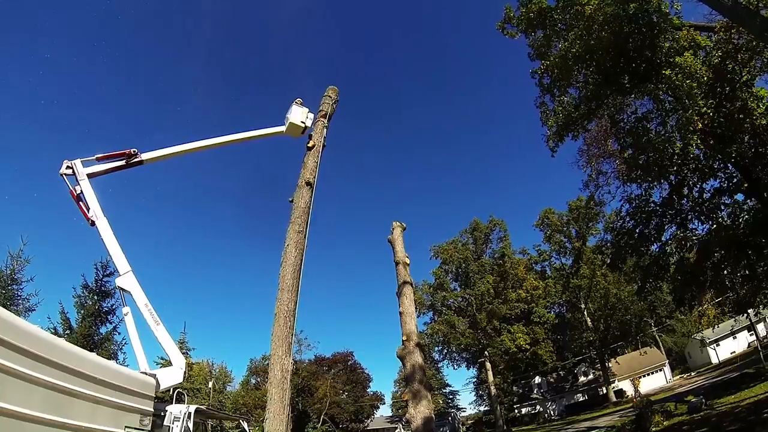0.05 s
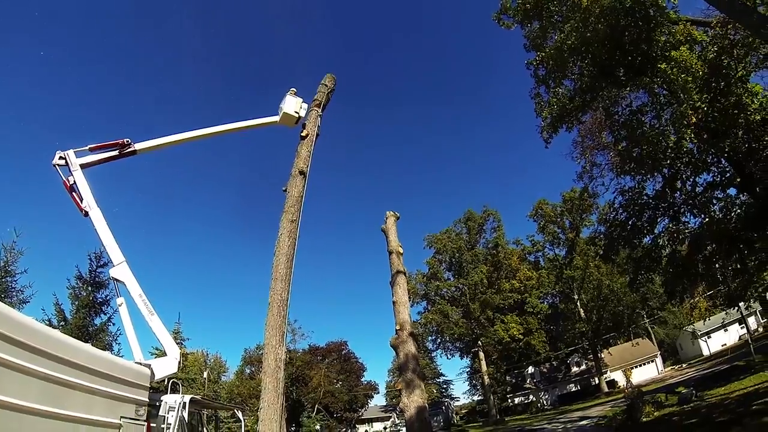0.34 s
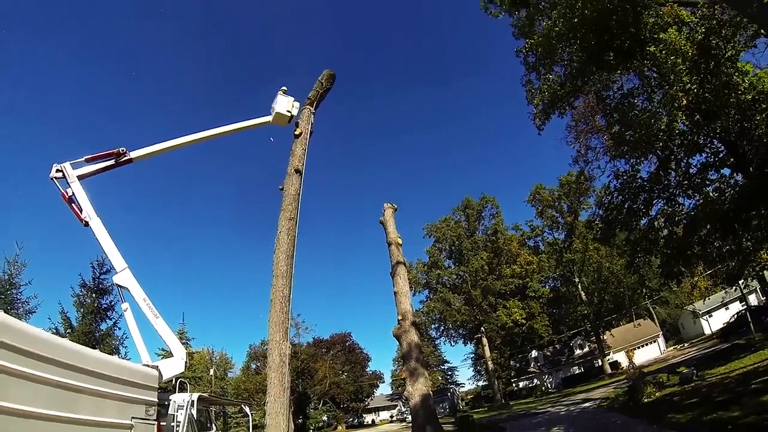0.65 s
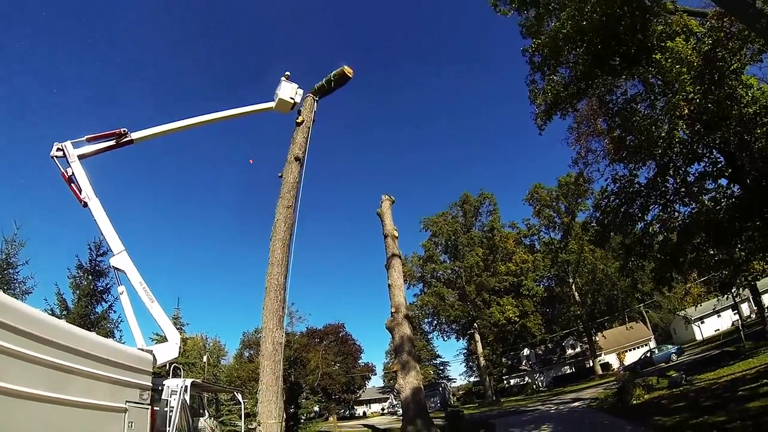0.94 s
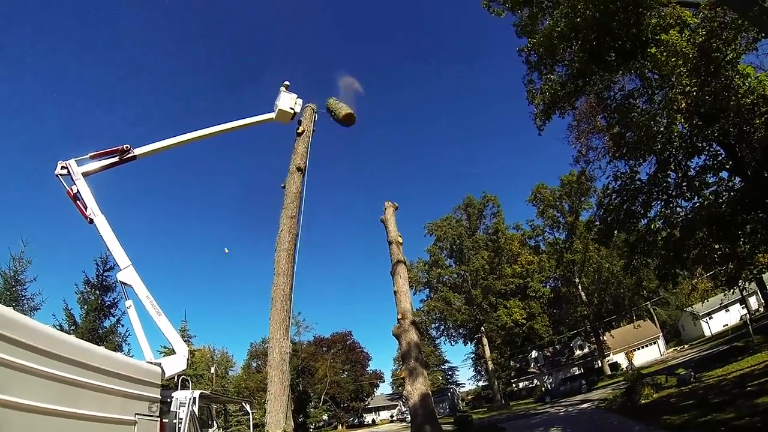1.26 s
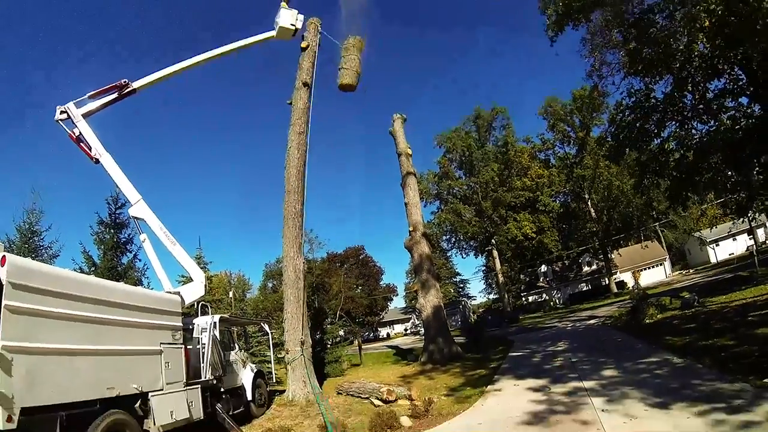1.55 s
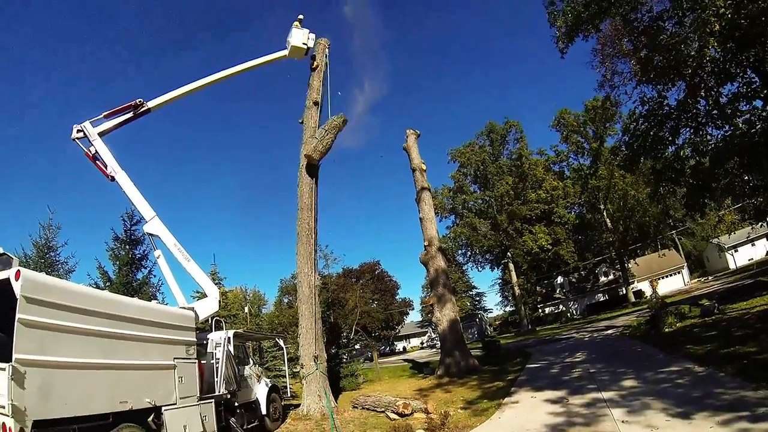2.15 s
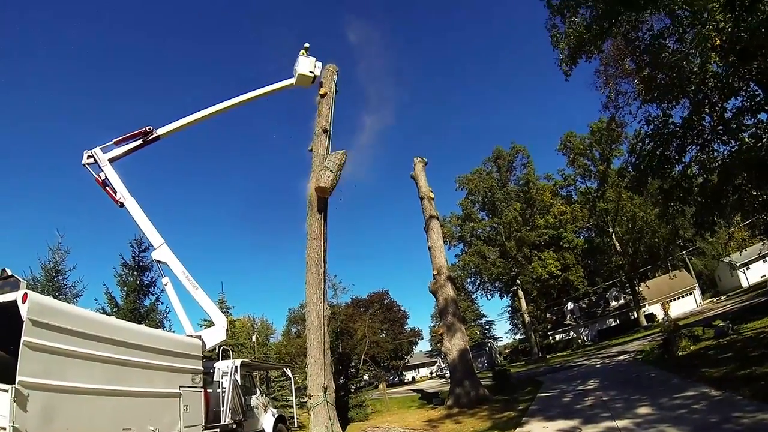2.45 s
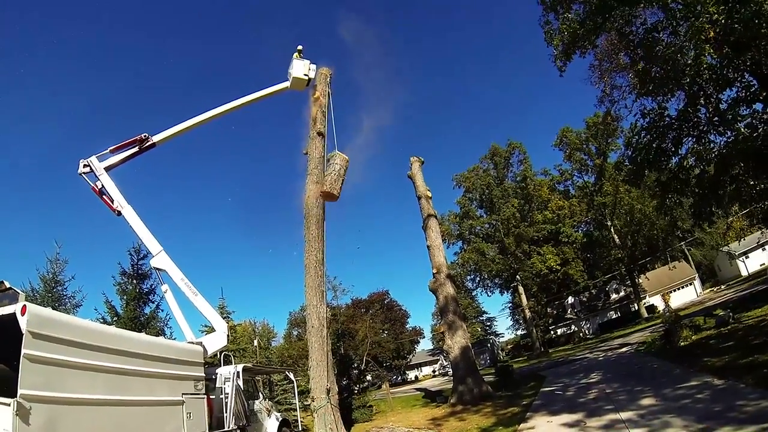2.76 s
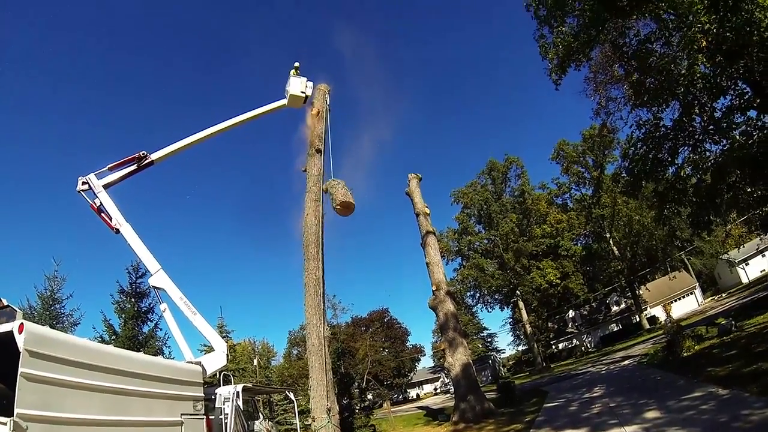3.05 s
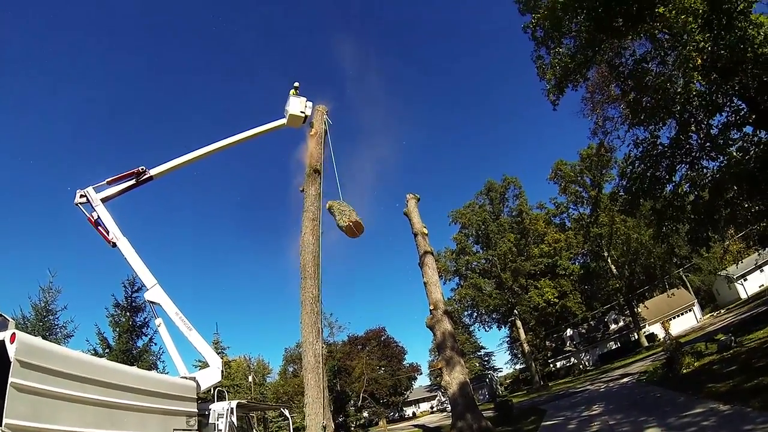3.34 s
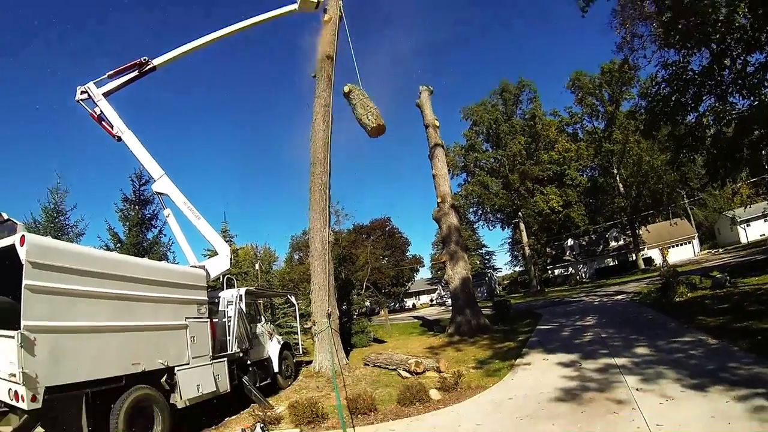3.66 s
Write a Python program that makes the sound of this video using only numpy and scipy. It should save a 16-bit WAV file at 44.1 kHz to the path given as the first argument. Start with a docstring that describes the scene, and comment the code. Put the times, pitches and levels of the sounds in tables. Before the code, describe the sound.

A falling log snaps its rope tight, then knocks against a trunk, over engine drone.

```python
"""A log caught on a rope

A sawn log tips off a standing trunk, runs out on its rope, is caught with a crack and swings into
the trunk. A lift truck's engine drones nearby. We hear it from a body-worn camera in a plastic case
that rings near 1.5 kHz. The camera clicks in its mount, rumbles with movement and air, and whines faintly.
"""
import sys
import numpy as np
from scipy import signal
from scipy.fft import rfft, irfft, next_fast_len
from scipy.io import wavfile
from scipy.ndimage import uniform_filter1d, map_coordinates

SR = 44100
rng = np.random.default_rng(int(sys.argv[2]) if len(sys.argv) > 2 else 0)


def pcm_store(signal):
    """Save signal as 16-bit PCM."""
    levels = np.round(np.clip(np.atleast_2d(signal), -1, 1) * 32767)
    wavfile.write(sys.argv[1], SR, levels.astype(np.int16).T)


N = 167580  # 3.8 seconds


def amp(db):
    """Turn decibels into a number to multiply by."""
    return 10 ** (np.asarray(db) / 20)


def unit(x):
    """Scale a signal to an average power of 1."""
    return x / np.sqrt(np.mean(x ** 2) + 1e-20)


def clock():
    """The time of each sample, in seconds."""
    return np.arange(N) / SR


def curve(rows):
    """Join (time [s], value) points with straight lines."""
    return np.interp(clock(), *np.transpose(rows))


def wobble(rate):
    """A smooth curve through `rate` random values a second."""
    return map_coordinates(rng.standard_normal(int(N * rate / SR) + 4), [clock() * rate])


def coloured(x, points):
    """Give a sound its tone colour from (frequency [Hz], level [dB]) points; only their shape counts."""
    size = 2 * next_fast_len(N)
    hz, db = np.transpose(points)
    shape_db = np.interp(np.log(np.fft.rfftfreq(size, 1 / SR) + 1), np.log(hz + 1), db)
    cepstrum = irfft(np.log(amp(shape_db)), size)
    # Folding this in half makes the filter ring after a hit, never before it.
    cepstrum[1:size // 2] *= 2
    cepstrum[size // 2 + 1:] = 0
    response = np.exp(rfft(cepstrum))
    response /= np.sqrt(np.mean(abs(response) ** 2))
    return irfft(rfft(x, size) * response, size)[:N]


def lowpass(x, hz):
    """Dull the treble above hz, as a soft contact does."""
    return signal.sosfilt(signal.butter(2, min(hz, SR / 2 - 1), fs=SR, output="sos"), x)


def grit(rate, spread_db):
    """Tiny random breaks of uneven size, about `rate` a second."""
    breaks = (rng.random(N) < rate / SR) * rng.choice([-1, 1], N)
    sizes = amp(spread_db * np.clip(rng.standard_normal(N), -2, 2))
    return unit(breaks * sizes)


def fade(start, fade_s, attack_s):
    """Rise quickly at `start`, then die away by 60 dB in fade_s seconds."""
    t = np.maximum(clock() - start, 0)
    return np.exp(-np.log(1000) * t / fade_s) * (1 - np.exp(-t / attack_s))


def struck(hits, notes):
    """Each hit rings an object's own notes, a little differently every time."""
    out = np.zeros(N + SR)
    t = np.arange(SR // 4) / SR
    for start, hit_db in hits:
        for hz, note_db, fade_s in notes:
            gain = amp(hit_db + note_db + rng.uniform(-1, 1))
            ring = np.exp(-np.log(1000) * t / fade_s) * np.sin(2 * np.pi * hz * t)
            out[int(start * SR):][:len(t)] += gain * ring
    return out[:N]


# The engine's tone colour through the case (frequency [Hz], level [dB])
ENGINE_COLOUR = [(110, -29), (220, -18.5), (310, -20), (380, -20), (540, -23.5), (660, -22.5), (740, -25),
                 (900, -19.5), (970, -27), (1030, -14.5), (1220, -14.5), (1320, -2.5), (1420, -4.5),
                 (1520, 2), (1620, 1), (1720, -13.5), (1930, -12.5), (2030, -20.5), (2220, -17),
                 (2400, -23), (2900, -25), (3170, -19), (3380, -27), (3600, -25), (3780, -27), (4050, -17),
                 (4400, -37.5), (5050, -31), (5800, -38.5), (6800, -40), (7700, -38), (9200, -44),
                 (10300, -43), (10800, -44), (11400, -47), (13000, -46), (15200, -47)]
# How the engine swells and sinks (time [s], relative level [dB])
ENGINE_LEVEL = [(0.0, -42.5), (0.34, -43), (1.54, -41.5), (1.81, -44), (2.32, -43), (2.54, -45), (3.8, -45)]
# The notes it hums (pitch [Hz], typical level [dB])
ENGINE_NOTES = [(456, -76), (672, -73.5), (915.5, -68.5), (1357, -68.5), (1486, -54.5), (1814, -65),
                (4005, -69.5), (4070, -87)]


def engine():
    """The engine clatters in pulses, one for each firing, and hums slightly unsteady notes."""
    firing_hz = 41.73
    phase = 2 * np.pi * np.cumsum(firing_hz + 0.2 * wobble(2)) / SR
    pulse = 1 + 0.12 * (np.cos(phase) + 0.42 * np.cos(2 * phase)) + 0.037 * np.cos(phase / 2)
    clatter = unit(coloured(pulse * rng.standard_normal(N), ENGINE_COLOUR))
    hum = np.zeros(N)
    for hz, db in ENGINE_NOTES:
        gain = np.sqrt(2) * amp(db + 2.5 * wobble(14))
        pitch = hz + 4.04 * wobble(14)
        hum += gain * np.sin(2 * np.pi * np.cumsum(pitch) / SR)
    level = curve(ENGINE_LEVEL)
    return amp(level - 1) * clatter + amp(level - level.mean()) * hum


# The camera's thin, high notes (pitch [Hz], level [dB])
WHINE_NOTES = [(10644, -75.5), (10692, -85), (10740, -92), (13188, -89)]


def whine():
    """The camera whines faintly and steadily."""
    return sum(np.sqrt(2) * amp(db) * np.sin(2 * np.pi * (hz * clock() + rng.random()))
               for hz, db in WHINE_NOTES)


# How strongly movement and air shake the camera (time [s], relative level [dB])
MOVEMENT_LEVEL = [(0.0, -47), (0.04, -39), (0.57, -21.5), (0.9, -25), (0.95, -16.5), (1.22, -30.5),
                  (1.39, -23), (1.63, -25), (1.84, -22), (1.95, -28.5), (2.7, -33.5), (2.96, -29.5),
                  (3.26, -34), (3.37, -30), (3.77, -35.5), (3.8, -48)]
MOVEMENT_DB = -1.75
# The rumble's deep tone colour (frequency [Hz], level [dB])
RUMBLE_COLOUR = [(3, -23), (10, 0), (22, 1.5), (32, 1.5), (42, -4), (59, -2), (72, -12), (87, -22.5),
                 (130, -26), (190, -44), (380, -48.5), (800, -65), (3000, -110)]


def rumble():
    """Movement and passing air make a low rumble."""
    air = coloured(rng.standard_normal(N), RUMBLE_COLOUR)
    local_power = abs(uniform_filter1d(air ** 2, size=SR // 8))
    even_air = air / np.sqrt(local_power + 1e-12)
    return amp(curve(MOVEMENT_LEVEL) + MOVEMENT_DB) * even_air


# Soft bumps on the camera (time [s], relative level [dB])
BUMP_HITS = [(0.233, -38.5), (0.295, -38.5), (0.556, -29), (0.69, -35.5), (0.735, -30.5), (0.769, -48),
             (0.918, -50), (1.012, -31.5), (1.32, -42), (1.374, -32), (1.518, -39), (1.574, -37),
             (1.785, -40), (2.321, -53), (2.609, -42), (2.692, -40.5), (3.121, -42), (3.349, -44),
             (3.489, -45), (3.65, -41)]
# Their dull tone colour (frequency [Hz], level [dB])
BUMP_COLOUR = [(30, -12), (65, 3.5), (130, -2.5), (220, -11), (390, -17), (550, -28), (1500, -25),
               (3000, -49), (8000, -100)]


def bumps():
    """The camera takes soft bumps, and small uneven jolts that grow with the movement."""
    movement = amp(curve(MOVEMENT_LEVEL) + MOVEMENT_DB)
    unevenness = unit(amp(6.5 * np.clip(wobble(40), -1.5, 1.5)))
    jolts = amp(-23.5) * movement * unevenness
    hits = sum(amp(db + 3.5) * fade(start, 0.063, attack_s=0.0028) for start, db in BUMP_HITS)
    return coloured(rng.standard_normal(N) * (hits + jolts), BUMP_COLOUR)


# Faint low groans (time [s], length [s], first pitch [Hz], last pitch [Hz], level [dB])
GROAN_SLIDES = [(0.501, 0.061, 410, 352, -46.5), (1.892, 0.069, 235, 273, -54.5),
                (1.977, 0.12, 285, 223, -48)]


def groans():
    """Soft notes swell, slide and fade: likely the uncut strip of wood bending, then the loaded rope."""
    settle_s = 0.022
    out = np.zeros(N)
    for start, length, first_hz, last_hz, db in GROAN_SLIDES:
        t = np.clip(clock() - start, 0, length)
        pitch = last_hz + (first_hz - last_hz) * np.exp(-t / settle_s)
        swell = np.sin(np.pi * t / length)
        out += amp(db) * swell * np.sin(2 * np.pi * np.cumsum(pitch) / SR)
    return out


def yard_echo(x):
    """Trees and houses send back a short, dull echo."""
    tail = lowpass(rng.standard_normal(N), hz=4300) * fade(0.022, fade_s=0.63, attack_s=0.012)
    return signal.fftconvolve(x, tail / np.linalg.norm(tail))[:N]


# Slips of the camera's mount (time [s], relative level [dB], treble limit [Hz])
MOUNT_SLIPS = [(.59, -23, 8800), (0.61, -33, 8000), (.625, -34, 8000), (.686, -32.5, 3500),
               (1.3281, -25.5, 8000), (1.382, -29.5, 3500), (1.437, -32, 3500), (3.4966, -24.5, 1420)]
# The tone colour of their scratch (frequency [Hz], level [dB])
SCRATCH_COLOUR = [(300, -12), (900, -10.5), (1500, 5.5), (2500, -2), (3400, -3.5), (4400, -15),
                  (6500, -21.5), (8000, -17.5), (13000, -30), (15200, -38)]
# The plastic case's own notes (pitch [Hz], relative level [dB], fade time [s])
CASE_NOTES = [(403, -12, 0.014), (700, -26, 0.075), (1480, -28, 0.078), (1555, -4.5, 0.064),
              (2070, -7.5, 0.027), (2860, -10, 0.035), (3250, -26, 0.02), (3700, -37, 0.015),
              (5040, -31, 0.0078), (7850, -17, .012), (10500, -20, 0.0029)]


def mount_clicks():
    """The mount slips with a short scratch and rings the case; softer contact sounds duller."""
    out = np.zeros(N)
    for start, db, treble_hz in MOUNT_SLIPS:
        burst = rng.standard_normal(N) * fade(start, 0.021, attack_s=0.0003)
        scratch = amp(db - 7) * coloured(burst, SCRATCH_COLOUR)
        ring = struck([(start, db)], CASE_NOTES)
        out += lowpass(ring + scratch, treble_hz)
    return out


# How loud the running rope is (time [s], relative level [dB])
RASP_LEVEL = [(1.3, -71), (1.312, -82), (1.328, -62), (1.336, -66), (1.54, -58.5), (1.615, -72)]
# Its tone colour (frequency [Hz], level [dB])
RASP_COLOUR = [(250, 20.5), (800, -11), (1500, 12), (2200, 15.5), (3200, 1), (4500, 1.5), (6500, -9),
               (8200, -4.5), (10000, -13), (15000, -35)]


def rope_run():
    """The rope rasps unevenly as it runs out."""
    rasp = unit(coloured(grit(rate=2500, spread_db=8.5), RASP_COLOUR))
    level = curve(RASP_LEVEL) + 11 + 2.6 * wobble(55.1)
    running = np.interp(clock(), [1.32, 1.36, 1.61, 1.64], [0, 1, 1, 0])
    return rasp * amp(level) * running


# Small ticks on the camera (time [s], relative level [dB])
TICK_HITS = [(1.535, -49), (1.551, -53), (2.019, -58), (2.828, -55), (3.263, -41.5), (3.27, -54),
             (3.402, -51), (3.496, -51)]
# Their bright tone colour (frequency [Hz], level [dB])
TICK_COLOUR = [(300, -35), (1100, -7), (1550, -5), (2100, -42), (3800, 8), (6500, -4), (8300, 6),
               (9500, -17), (13000, -14), (15000, -35)]


def ticks():
    """Each tick on the camera is a tiny, sharp burst of noise."""
    hits = sum(amp(db + 1.5) * fade(start, 0.016, attack_s=0.00039) for start, db in TICK_HITS)
    return coloured(rng.standard_normal(N) * hits, TICK_COLOUR)


# Jerks as the rope takes the weight (time [s], relative level [dB])
ROPE_JERKS = [(1.6215, -23.5), (1.6247, -15), (1.6279, -17), (1.6318, -20)]
# The notes each jerk rings (pitch [Hz], relative level [dB], fade time [s])
JERK_NOTES = [(660, -45, 0.02), (970, -37, 0.015), (1290, -25, 0.027), (1594, 0.5, 0.03), (1870, -40, .02),
              (2180, -15.5, 0.031)]
# The tone colour of rope biting into bark (frequency [Hz], level [dB])
CRUNCH_COLOUR = [(120, -73), (200, -19), (377, -12), (436, -10), (582, -18), (661, -10), (737, -19),
                 (899, -13), (1140, -16.5), (1270, -3.5), (1390, 2), (1550, -5), (2000, -12.5), (2760, -18),
                 (2970, -18), (3970, -24.5), (5600, -31.5), (8500, -27), (15200, -51)]


def rope_catch():
    """The rope snaps tight with a crack and crunches into the bark."""
    bite = grit(rate=11000, spread_db=2.5) * fade(1.6218, fade_s=0.2, attack_s=0.0023)
    crunch = amp(-25.5) * coloured(bite, CRUNCH_COLOUR)
    crack = lowpass(struck(ROPE_JERKS, JERK_NOTES), hz=3530)
    return crunch + crack


# The log hitting the trunk (time [s], relative level [dB], fade time [s], treble limit [Hz])
LOG_HITS = [(2.092, -31, 0.043, 1500), (2.135, -25.5, 0.037, 14000), (2.142, -27.5, 0.1, 11900),
            (2.157, -27.5, 0.048, 10000), (2.184, -34, 0.14, 4150), (2.198, -28, 0.049, 2000),
            (2.357, -29, 0.062, 2240), (2.401, -38.5, 0.1, 2190), (2.486, -36.5, .04, 2000),
            (3.097, -37.5, 0.11, 3060)]
# The tone colour of those hits (frequency [Hz], level [dB])
WOOD_COLOUR = [(130, -45), (220, -14), (388, -26), (626, -21), (907, -25), (1520, 4.5), (1940, -15.5),
               (2090, -6), (2770, -15.5), (3030, -12), (3250, -26), (3550, -14.5), (4310, -28), (4710, -21),
               (6040, -32), (8460, -31), (9400, -41), (13900, -46), (15200, -62)]
# The low notes of log and trunk (pitch [Hz], relative level [dB], fade time [s])
WOOD_NOTES = [(122.5, 1.5, 0.2), (151, 0, 0.19), (180, -12, 0.089), (279.4, -7.5, 0.113), (447, -9, 0.074),
              (588, -13.5, 0.11)]


def log_knocks():
    """Each hit crushes bark; the first full blow also booms in the wood."""
    crushing = np.zeros(N)
    for start, db, fade_s, treble_hz in LOG_HITS:
        burst = grit(rate=7000, spread_db=2) * fade(start, fade_s, attack_s=0.00081)
        crushing += amp(db) * lowpass(burst, treble_hz)
    boom = lowpass(struck([(2.141, -29.5)], WOOD_NOTES), hz=1500)
    return amp(1.5) * coloured(crushing, WOOD_COLOUR) + boom


def scene():
    """Mix the tree work and its echo with the engine and the knocking about of the camera."""
    work = rope_run() + rope_catch() + log_knocks() + groans()
    outdoors = work + amp(-19) * yard_echo(work) + engine()
    handling = rumble() + bumps() + ticks() + mount_clicks()
    return (outdoors + handling)[None]


def record(dry):
    """The camera adds its whine and cuts off the very highest treble."""
    top_hz = 15300
    size = 2 * next_fast_len(N)
    kept = np.fft.rfftfreq(size, 1 / SR) < top_hz
    return irfft(rfft(dry + whine(), size) * kept, size)[..., :N]


dry = scene()
out = record(dry)
pcm_store(out)
```